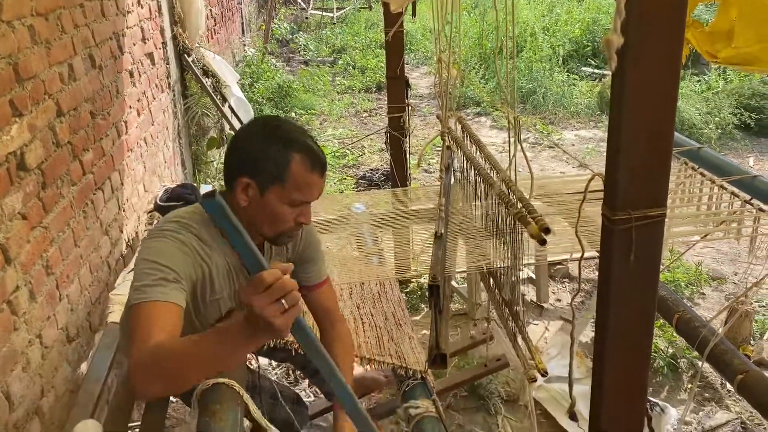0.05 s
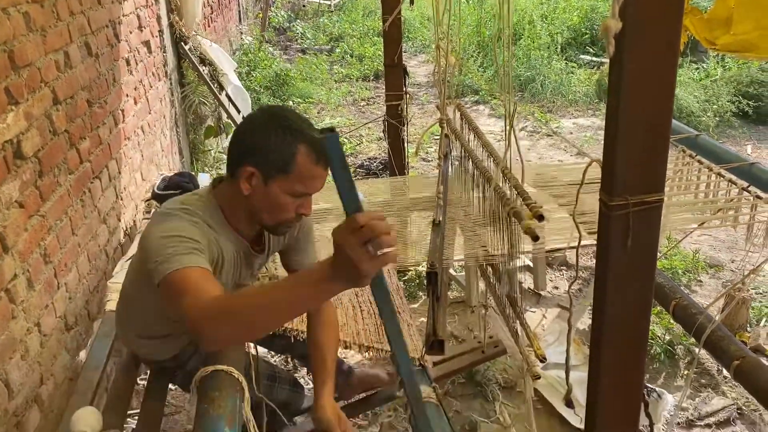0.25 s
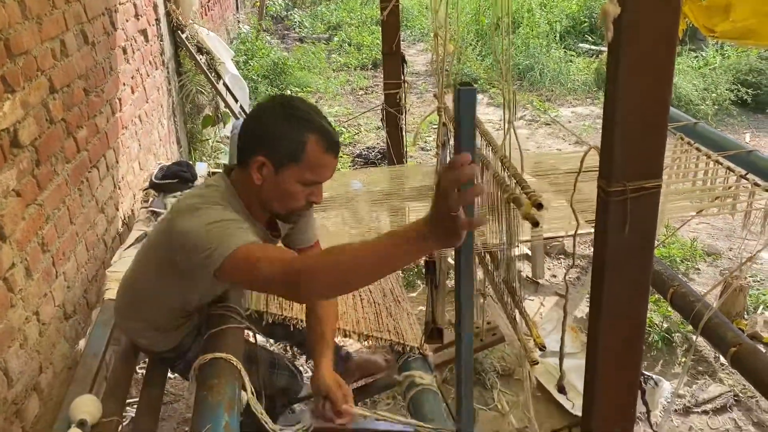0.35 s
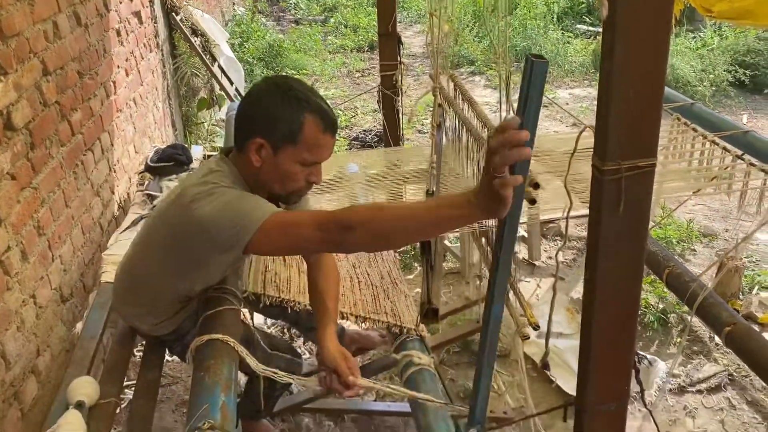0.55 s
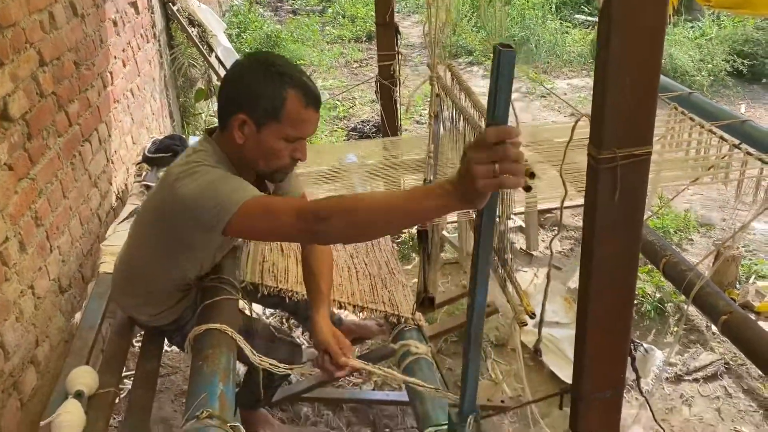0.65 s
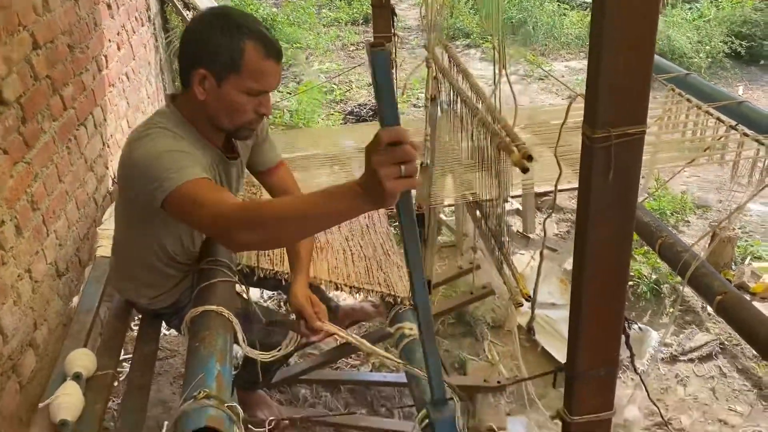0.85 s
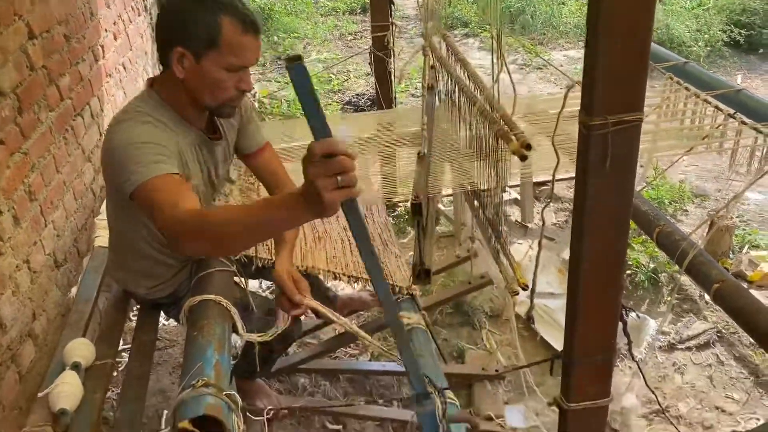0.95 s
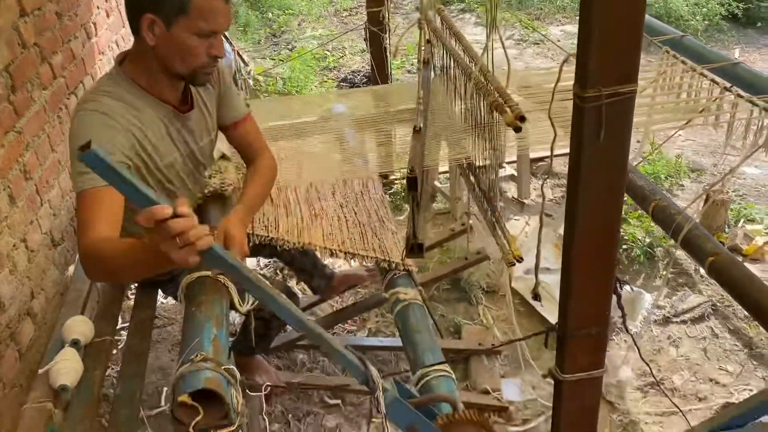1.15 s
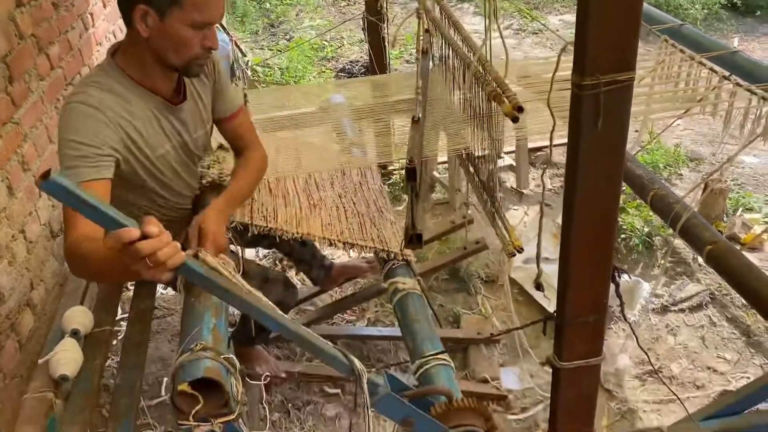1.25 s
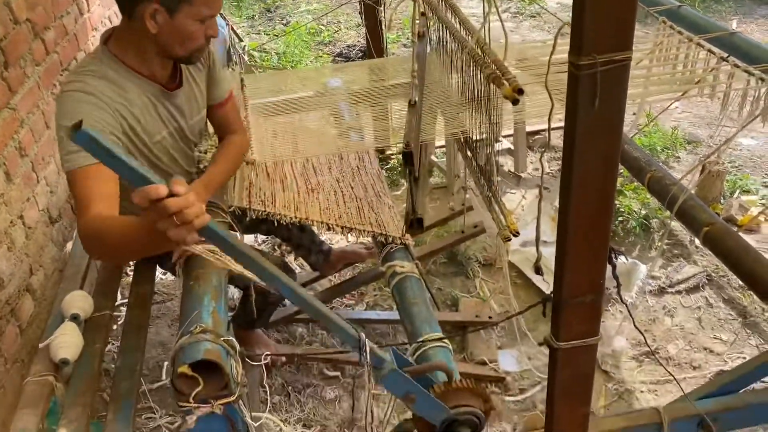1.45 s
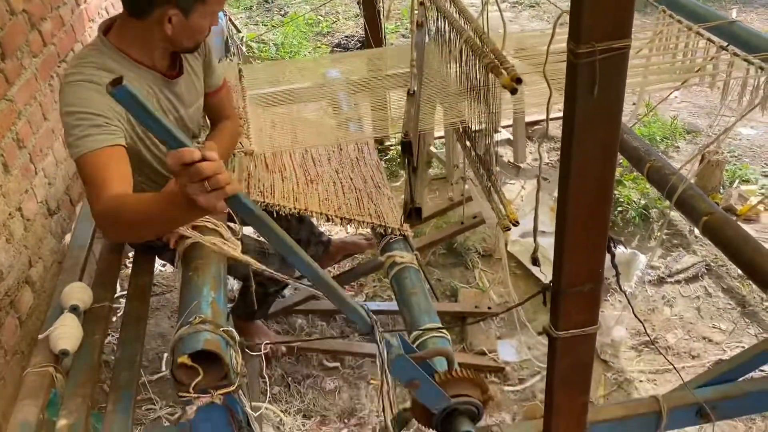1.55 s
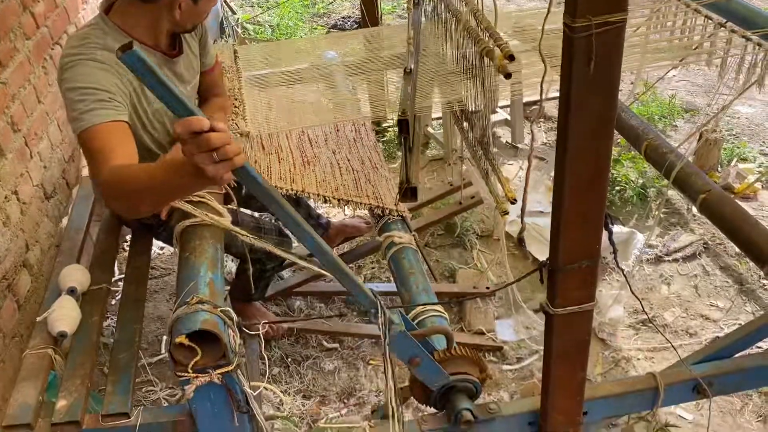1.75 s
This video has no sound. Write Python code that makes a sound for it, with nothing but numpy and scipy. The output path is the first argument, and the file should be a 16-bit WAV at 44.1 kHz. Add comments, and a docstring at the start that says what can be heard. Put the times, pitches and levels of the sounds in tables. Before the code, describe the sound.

Ringing metal ratchet clicks, then heavier clanks and clacks, as a lever cranks a loom roller.

```python
"""A long steel lever works the ratchet on a loom's roller, outdoors beside a brick wall, a little left
of the stereo microphone. Pushed forward, its pawl drops over the teeth and rings; pulled back, it seats
with a clank, the roller turns with dull thuds and the catch clacks over three teeth. The pull ends in a
hollow clank, light knocks and a thin squeak. Each contact rings the steel and rattles the frame, and
wall and yard answer. Behind it all lie steady outdoor air and a faint, far hum."""
import sys
import numpy as np
from scipy import signal
from scipy.fft import irfft
from scipy.io import wavfile

SR = 44100
rng = np.random.default_rng(int(sys.argv[2]) if len(sys.argv) > 2 else 0)


def unload_audio(sound):
    """Save the sound as a 16-bit wav file, at the path given as the first command line argument."""
    columns = np.transpose(np.atleast_2d(sound))
    # keep every value between -1 and 1, then stretch to whole-number steps
    steps = np.round(np.clip(columns, -1, 1) * 32767)
    wavfile.write(sys.argv[1], SR, steps.astype(np.int16))


N = 79380
TIME = np.arange(N) / SR
EDGES = np.r_[np.geomspace(25, 800, 10)[:-1], np.geomspace(800, 6000, 14)[:-1],
              np.linspace(6000, 16500, 16)]  # of the noise bands, in Hz
CENTRES = np.sqrt(EDGES[1:] * EDGES[:-1])

# The far hum. Each row: time in seconds, level in dB.
HUM_LEVEL = [(0, -57), (.17, -59.5), (.7, -61.5), (1.8, -74.5)]
# Decay of the yard's echo and the frame's rattle. Each row: frequency in Hz, base t60 in seconds.
YARD_T60 = [(150, 0.59), (1000, 0.46), (2500, 0.55), (5000, 0.54), (12000, 0.22)]
FRAME_T60 = [(150, 0.21), (600, .2), (1500, 0.26), (4000, 0.14), (8000, .12), (15000, 0.072)]
# Width at the microphone. Each row: frequency in Hz, left-right correlation.
LIKENESS = [(60, 0.95), (250, 0.88), (600, .68), (1500, 0.18), (4000, .58), (7000, 0.57), (10000, .1),
            (15000, .1)]
# Phase at the microphone. Each row: frequency in Hz, lead of the left side in radians.
LEFT_LEAD = [(1000, -.1), (3000, .3), (7100, -0.41), (10000, -0.99), (12200, -0.89), (15000, -1.4)]

# The colour of each noise as heard, most with narrow dips near 9 and 13 kHz.
# Each row: frequency in Hz, relative density in dB.
AIR_SPECTRUM = [(25, -1), (45, 7.5), (70, 3), (120, -2.5), (220, -10), (330, -7.5), (500, -12.5),
                (900, -19), (1250, -8), (2000, -17.5), (3700, -22), (7100, -28), (8900, -43), (11300, -28),
                (13200, -50), (15000, -39.5)]
SLIDE_SPECTRUM = [(200, 2.5), (1200, 12), (4000, -7), (7300, -1), (9000, -31), (11000, -11.5), (13200, -31),
                  (15000, -32)]
SQUEAK_SPECTRUM = [(5000, -28), (9500, -25), (11100, 7), (12300, -22), (13300, -23), (15000, -13)]
THUD_SPECTRUM = [(35, -15), (75, 2), (120, -2.5), (200, -1), (450, -10), (900, -20), (2000, -19),
                 (6000, -73)]
STOP_CLATTER = [(150, -10), (550, -4), (850, 7.5), (1250, 2), (1700, 5), (2400, -3), (3400, -1.5),
                (4300, -2), (5300, -6.5), (6300, -9.5), (7400, -2), (8300, -15), (9100, -29), (11200, -8),
                (13200, -26), (15000, -20)]
CATCH_CLATTER = [(150, -4.5), (280, -7), (550, 0.5), (900, 2), (1300, 1), (1800, 3.5), (2400, 1.5),
                 (3000, 0), (3700, 6), (4400, 1), (5400, 2), (6300, -7), (8000, -3.5), (9100, -18),
                 (10800, -7), (13200, -26), (15000, -7.5)]
PAWL_CLATTER = [(150, -22), (300, -6.5), (450, -11), (630, -1.5), (850, -8.5), (1230, 7.5), (1450, -0.5),
                (1700, 4.5), (2400, -5), (3200, -3), (4100, -0.5), (5300, -6), (6100, -8), (7300, 9.5),
                (9000, -42.5), (11000, -3.5), (13200, -18), (15000, -19)]
LEVER_CLATTER = [(150, -13), (330, 4), (600, 2.5), (900, 5.5), (1250, -1), (1700, 6), (2400, 1), (3300, -2),
                 (4200, 0.5), (5300, -1.5), (6100, -7.5), (7300, 2), (8200, -6), (9100, -28),
                 (11000, -10.5), (13200, -26.5), (15000, -16)]

# Steel slides on steel. Each row: start and length in seconds, level in dB, tilt in dB per octave.
SLIDES = [(0.092, 0.3, -53, 3), (1.343, 0.15, -47, -4.5)]
# The push begins. Each row: start in seconds, pitch in Hz, level in dB, t60 in seconds.
KNOCKS = [(0.04, 2060, -39.5, 0.039), (0.045, 958, -42, 0.057)]
# The roller takes the load. Each row: start in seconds, level in dB, t60 in seconds.
THUDS = [(0.809, -30, 0.36), (0.847, -31, 0.58), (0.911, -35, 0.38), (1.12, -42, 0.17), (1.247, -33, 0.13),
         (1.416, -48.5, 0.34), (1.477, -33.5, 0.37), (1.672, -47, 0.14)]
# Steel contacts. Each row: start in seconds, clatter level in dB, tilt in dB per octave,
# ring level in dB, factor on the modes' t60.
STOPS = [(1.4437, -22.5, 1, -22.5, 0.72)]
CLACKS = [(1.0232, -21, 2.1, -21, 0.7), (1.112, -22.5, -0.2, -24, 1.09), (1.2372, -24, 0.16, -26, 1.05)]
PAWL_DROPS = [(.2015, -24, -0.5, -17, 1.1), (0.2763, -21.5, 0, -14.5, 1.05), (0.342, -29.5, -2, -24, 1.4),
              (.405, -22.5, -0.5, -17, 1.4), (.462, -26.5, -1.5, -20.5, 1.03),
              (.498, -31.5, -1, -22.5, 0.85), (.522, -34, -2.5, -27, 1.7), (0.547, -45, -4, -34, 0.45)]
CLANKS = [(0.776, -32, -1.5, -29.5, 0.2), (0.7894, -18, 2.8, -17.5, 0.5), (.797, -22, 2.5, -17, 0.49),
          (0.8067, -21, 0.5, -22, 0.3), (.842, -25, 0.5, -35, 0.94), (.868, -27.5, -0.5, -37, .7),
          (.902, -29, -1.5, -29.5, 0.58), (.913, -24.5, -0.8, -31, 0.62), (.922, -31.5, 0.5, -40, 1.3),
          (1.382, -38.5, 1, -44, 1), (1.4, -50, -0.5, -42, 1), (1.421, -41, 3, -58, 0.88),
          (1.524, -39.5, 0.5, -30, 0.97), (1.574, -40.5, -1.5, -27, 0.22), (1.601, -45, 3, -39, 0.78)]
# The catch's highest modes, tooth by tooth. Each row: gain in dB from 9 to 13 kHz, gain in dB above.
CLACK_PING_DB = [(-3, 6), (1.5, 1), (-14, -8)]

# The modes of each steel part. Each entry: pitch in Hz.
STOP_HZ = [885, 1030, 1605, 1740, 2170, 2460, 3410, 3763, 5114, 7392, 11170]
CATCH_HZ = [262, 880, 1357, 1676, 1814, 2180, 2265, 2565, 3440, 3700, 4168, 4378, 5130, 6560, 7332, 10835,
            14350, 14790]
PAWL_HZ = [664, 1149, 1217, 1293, 1543, 1790, 2592, 5420, 7117, 9893, 10225, 11090, 12202, 14382]
LEVER_HZ = [882, 1152, 1246, 1272, 1305, 1513, 1715, 3155, 3700, 4570, 5281, 5530, 6487]
# The same modes in order. Each row: relative level in dB, base t60 in seconds.
STOP_RING = [(-5, 0.11), (-8, 0.19), (-8, 0.3), (-4, 0.12), (-8.5, 0.11), (-6.5, 0.15), (-4.5, .1),
             (-4, 0.077), (-6.5, 0.074), (-1, 0.051), (-12, 0.048)]
CATCH_RING = [(-15.5, 0.3), (-15, 0.31), (-15, 0.25), (0, 0.062), (-11, 0.13), (-1, 0.055), (-24, 0.73),
              (-14.5, 0.35), (-20, 0.18), (-15, 0.26), (-5, 0.14), (-5.5, 0.11), (-10, 0.086),
              (-12.5, 0.13), (-14, 0.073), (-10, 0.13), (-23, 0.19), (-11, 0.09)]
PAWL_RING = [(-24, 0.14), (-8.5, 0.17), (-16, 0.095), (-11, 0.21), (-35, 0.45), (-13.5, 0.06),
             (-24.5, 0.46), (-20, .14), (1, 0.28), (-26.5, 0.16), (-23.5, .13), (-17.5, .14), (-17.5, 0.16),
             (-25.5, .17)]
LEVER_RING = [(-13, 0.16), (-5.5, 0.23), (-3.5, 0.44), (-11, 0.55), (-7.5, 0.33), (-22.5, 0.33),
              (-11, 0.16), (-25.5, 0.31), (-23.5, 0.11), (-23, 0.18), (-15, 0.083), (-19, 0.27), (-24, .13)]


def from_db(db):
    """Decibels to gain."""
    return 10 ** (np.asarray(db) / 20)


def at_hz(points, hz):
    """Read a table on a log-frequency axis."""
    points = np.array(points)
    return np.interp(np.log(hz), np.log(points[:, 0]), points[:, 1])


def dying(t, t60):
    """Exponential decay, 60 dB down after t60 seconds."""
    return np.exp(-np.log(1000) * np.maximum(t, 0) / t60)


def struck(s, hz, t60):
    """One decaying mode, struck at s seconds."""
    return np.sin(2 * np.pi * hz * np.maximum(TIME - s, 0)) * dying(TIME - s, t60)


def swell(s, t60):
    """An envelope that rises for 10 ms and dies away."""
    return np.clip((TIME - s) / 0.01, 0, 1) * dying(TIME - s, t60)


def noise_bands(size):
    """Stereo noise of rms 1, most alike left and right in the bass: bands x 2 x size."""
    hz = np.fft.rfftfreq(size, 1 / SR)
    white = np.exp(2j * np.pi * rng.random((2, len(hz))))
    bands = []
    for low, high, centre in zip(EDGES, EDGES[1:], CENTRES):
        noise = irfft(white * ((hz >= low) & (hz < high)), size)
        mid, side = noise / noise.std()
        alike = at_hz(LIKENESS, centre)
        bands.append(np.sqrt((1 + alike) / 2) * mid + np.sqrt((1 - alike) / 2) * side * [[1], [-1]])
    return np.array(bands)


def band_gains(spectrum, tilt=0):
    """Gain of each band for a spectrum tilted in dB per octave; total power 1."""
    gains = from_db(at_hz(spectrum, CENTRES) + tilt * np.log2(CENTRES)) * np.sqrt(np.diff(EDGES))
    return gains / np.linalg.norm(gains)


def coloured(bands, spectrum, tilt=0):
    """Mix noise bands to a spectrum."""
    return np.tensordot(band_gains(spectrum, tilt), bands, 1)


def clatter(hits, spectrum, t60_scale, fresh):
    """Contacts shake the frame's dense modes and the yard answers; the fresh share is new each time."""
    size, build_s, hold_s, yard_db = 2 ** 15, 0.00078, 0.0025, -19.5
    t = TIME[:size]
    rattle = dying(t - hold_s, t60_scale * at_hz(FRAME_T60, CENTRES)[:, None])
    rattle *= 1 - np.exp(-t / build_s)
    yard = from_db(yard_db) * dying(t, at_hz(YARD_T60, CENTRES)[:, None])
    envelope = np.hypot(rattle, yard)[:, None]
    repeated = np.sqrt(1 - fresh) * noise_bands(size)
    varying = np.sqrt(fresh) * noise_bands(size)
    hardest_db = max(hit[1] for hit in hits)
    treble_octaves = np.maximum(np.log2(CENTRES / 3630), 0)
    out = np.zeros((2, N))
    for (s, db, tilt, _, _), shift in zip(hits, rng.integers(0, size, len(hits))):
        response = envelope * (repeated + np.roll(varying, shift, axis=-1))
        soft_db = 0.6 * (db - hardest_db) * treble_octaves  # lighter contacts lose treble
        gains = from_db(db + soft_db) * band_gains(spectrum, tilt)
        start = int(s * SR)
        out[:, start:start + size] += np.tensordot(gains, response, 1)[:, :N - start]
    return out


def ringing(hits, pitches, modes, uneven_db, tilt_share, ping_db=0):
    """The clear modes of a steel part; each contact resets their strength and damping."""
    hz = np.array(pitches)[:, None]
    mode_db, t60 = np.transpose(modes)[:, :, None]
    octaves = np.log2(hz / pitches[np.argmax(mode_db)])
    ping_range = np.searchsorted((9000, 13000), hz)
    pings = np.broadcast_to(ping_db, (len(hits), 2))
    level = np.zeros((len(hz), N))
    for (s, _, tilt, db, t60_scale), ping in zip(hits, pings):
        start = int(s * SR)
        chance_db = uneven_db * rng.standard_normal(hz.shape)
        colour_db = tilt_share * tilt * octaves + np.r_[0, ping][ping_range]
        strength = from_db(db + mode_db + chance_db + colour_db)
        level[:, start:] = strength * dying(TIME[:N - start], t60_scale * t60)
    pole = np.exp(-1 / (0.00069 * SR))  # rounds each attack
    level = signal.lfilter([(1 - pole) ** 2], [1, -2 * pole, pole ** 2], level + 1e-18)
    phase = 2 * np.pi * (hz * TIME + rng.random(hz.shape))
    lead = at_hz(LEFT_LEAD, hz) / 2
    return np.array([(level * np.sin(phase + side * lead)).sum(0) for side in (1, -1)])


def outdoors(air_db=-51, hum_hz=320.6):
    """Steady air around the microphone, with a far hum that fades."""
    hum_rms = from_db(np.interp(TIME, *np.transpose(HUM_LEVEL)))
    hum = hum_rms * np.sqrt(2) * np.sin(2 * np.pi * hum_hz * TIME)
    return from_db(air_db) * coloured(noise_bands(N), AIR_SPECTRUM) + hum


def sliding(bands, edge_s=0.012):
    """Steel rubs lightly on steel between the blows."""
    out = np.zeros((2, N))
    for s, length, db, tilt in SLIDES:
        gate = np.interp(TIME, [s - edge_s / 2, s, s + length, s + length + edge_s], [0, 1, 1, 0])
        out += from_db(db) * gate * coloured(bands, SLIDE_SPECTRUM, tilt)
    return out


def squeak(bands, peak_s=1.597, width_s=0.017, db=-48):
    """The wheel squeaks thinly after the stop."""
    envelope = np.exp(-((TIME - peak_s) / width_s) ** 2 / 2)
    return from_db(db) * envelope * coloured(bands, SQUEAK_SPECTRUM)


def knock():
    """Two short modes make a small knock as the push begins."""
    return sum(from_db(db) * struck(s, hz, t60) for s, hz, db, t60 in KNOCKS)


def lingering(hz=1248, relative_db=-30, t60=1.6):
    """The lever's longest mode gathers every contact and sings on faintly."""
    hits = PAWL_DROPS + CLANKS + CLACKS + STOPS
    power = sum((from_db(db + relative_db) * swell(s, t60)) ** 2 for s, db, *_ in hits)
    return np.sqrt(power) * np.sin(2 * np.pi * hz * TIME)


def frame(hz=148.7, relative_db=-24, t60=0.35):
    """The frame booms low under each clack and the stop."""
    return sum(from_db(db + relative_db) * struck(s, hz, t60) for s, db, *_ in CLACKS + STOPS)


def roller(bands, boom_hz=77.6, relative_db=-9.5, boom_t60=0.41):
    """The roller thuds softly in its frame, which sets its lowest mode booming."""
    power = sum((from_db(db) * swell(s, t60)) ** 2 for s, db, t60 in THUDS)
    boom = sum(from_db(db + relative_db) * struck(s, boom_hz, boom_t60) for s, db, _ in THUDS)
    return np.sqrt(power) * coloured(bands, THUD_SPECTRUM) + boom


def stop():
    """The lever ends its pull with a hollow clank."""
    rattle = clatter(STOPS, STOP_CLATTER, t60_scale=1, fresh=0.5)
    return rattle + ringing(STOPS, STOP_HZ, STOP_RING, uneven_db=2.3, tilt_share=0.3)


def catch():
    """The catch clacks over the teeth of the turning wheel."""
    rattle = clatter(CLACKS, CATCH_CLATTER, t60_scale=1, fresh=0.13)
    ring = ringing(CLACKS, CATCH_HZ, CATCH_RING, uneven_db=2.5, tilt_share=0.27, ping_db=CLACK_PING_DB)
    return rattle + ring


def pawl():
    """On the push, the free pawl drops and bounces over the teeth with a bright ring."""
    rattle = clatter(PAWL_DROPS, PAWL_CLATTER, t60_scale=1.37, fresh=0.97)
    return rattle + ringing(PAWL_DROPS, PAWL_HZ, PAWL_RING, uneven_db=0.15, tilt_share=0.92)


def lever():
    """On the pull, the pawl seats, grinds and shifts under load, and the lever rings."""
    rattle = clatter(CLANKS, LEVER_CLATTER, t60_scale=0.79, fresh=0.84)
    return rattle + ringing(CLANKS, LEVER_HZ, LEVER_RING, uneven_db=3.2, tilt_share=0.22)


def scene(pan_db=0.6):
    """The loom stands in the open yard, slightly left of the microphone."""
    bands = noise_bands(N)
    ratchet = pawl() + lever() + catch() + stop() + lingering()
    loom = ratchet + frame() + roller(bands) + sliding(bands) + squeak(bands) + knock()
    return loom * from_db([[pan_db], [-pan_db]]) + outdoors()


def record(dry, rumble_hz=46.6, top_hz=16900):
    """The microphone drops the deepest rumble; the top is cut."""
    dry = signal.sosfilt(signal.butter(4, rumble_hz, "high", fs=SR, output="sos"), dry)
    return signal.sosfilt(signal.cheby2(12, 70, top_hz, fs=SR, output="sos"), dry)


dry = scene()
out = record(dry)
unload_audio(out)
```